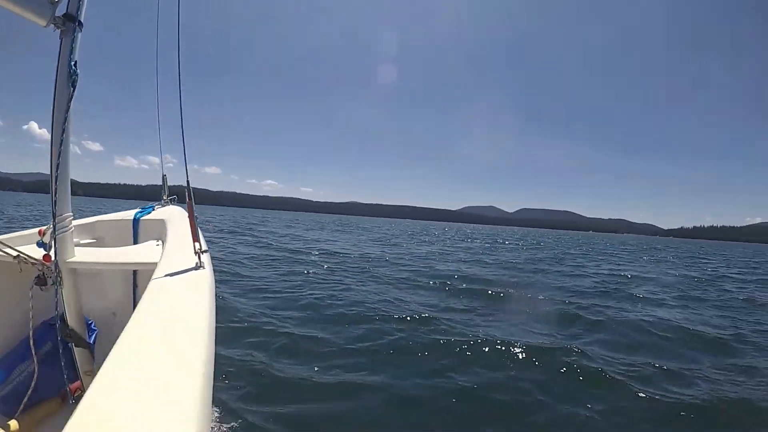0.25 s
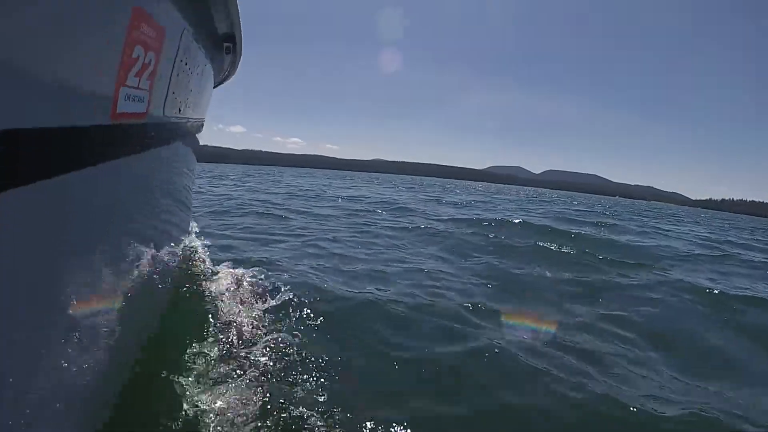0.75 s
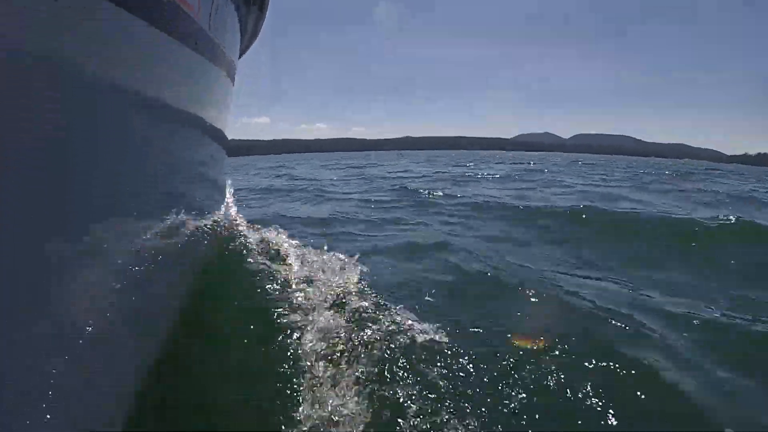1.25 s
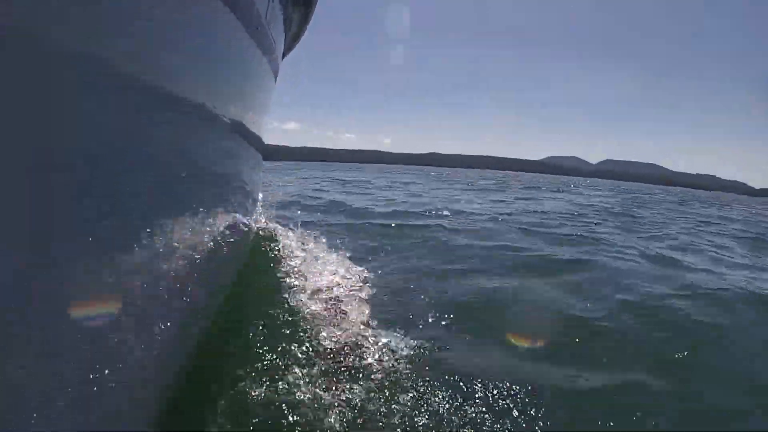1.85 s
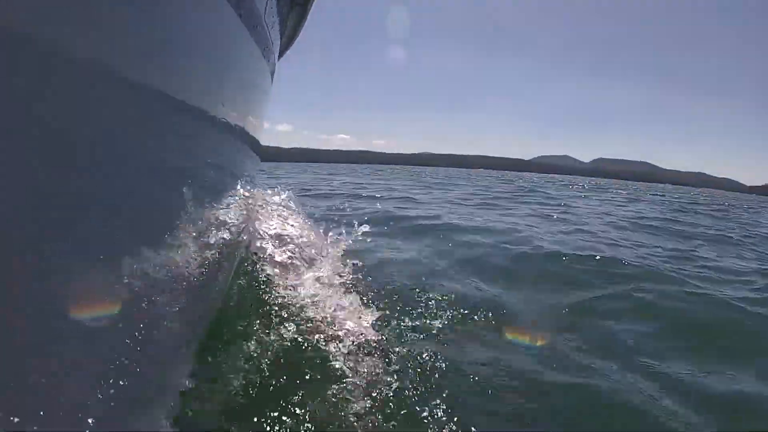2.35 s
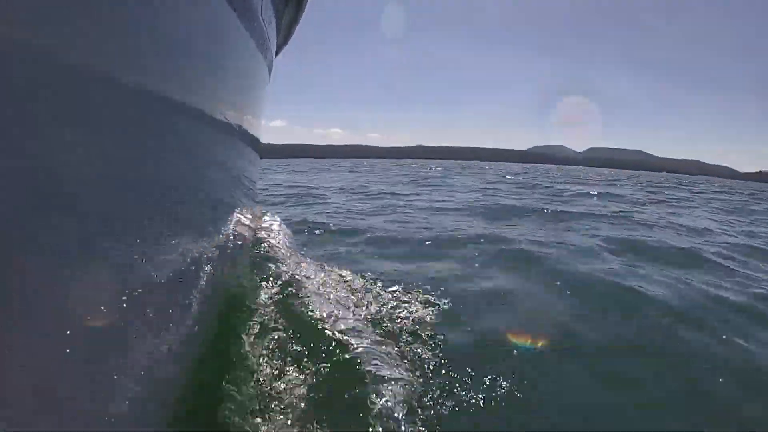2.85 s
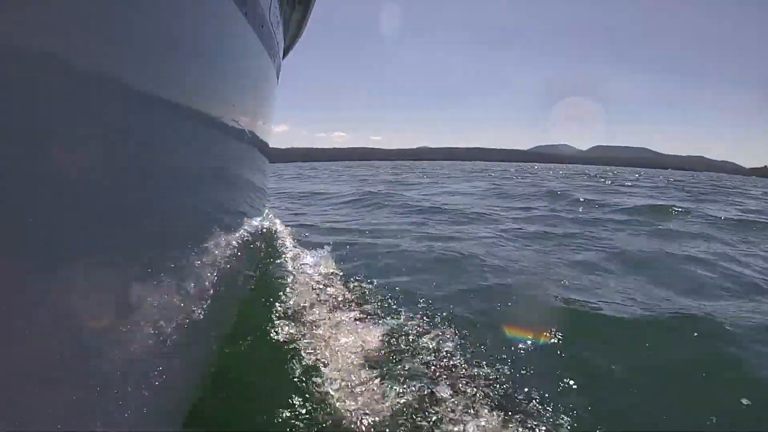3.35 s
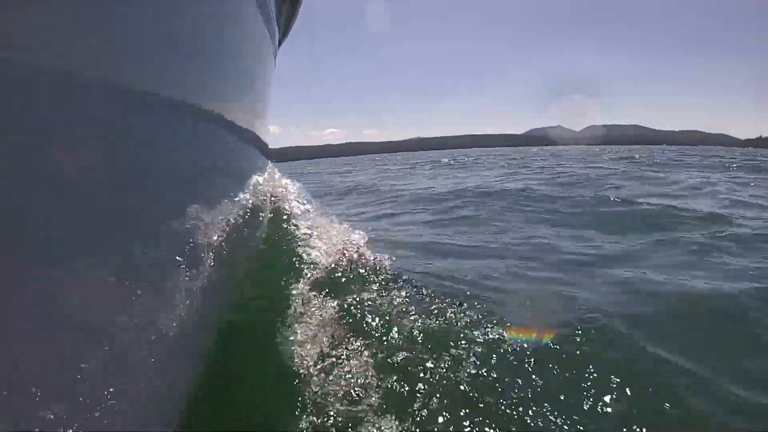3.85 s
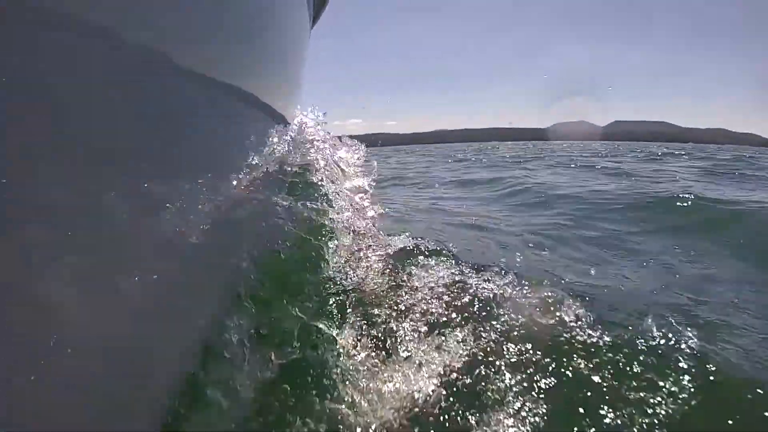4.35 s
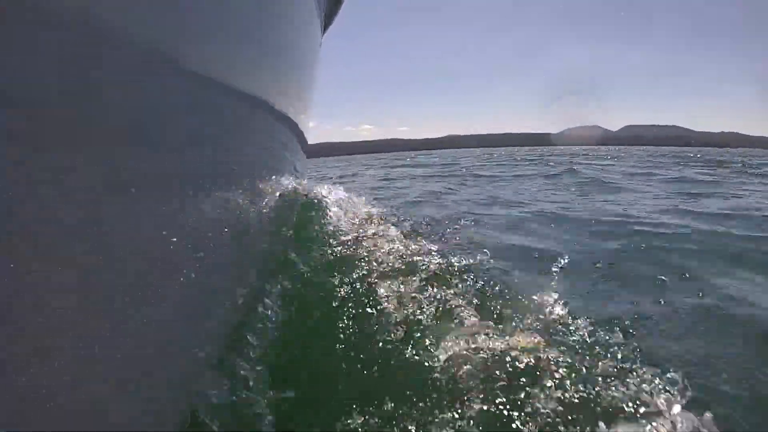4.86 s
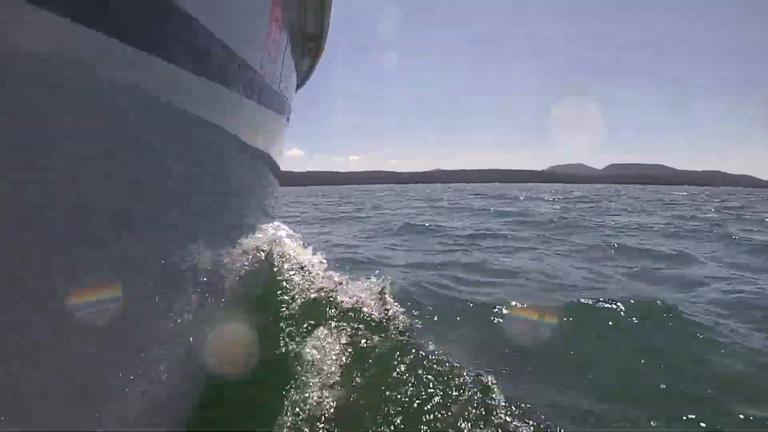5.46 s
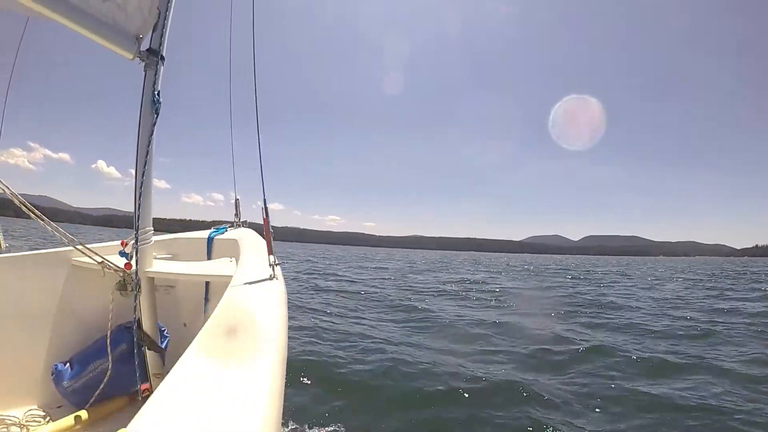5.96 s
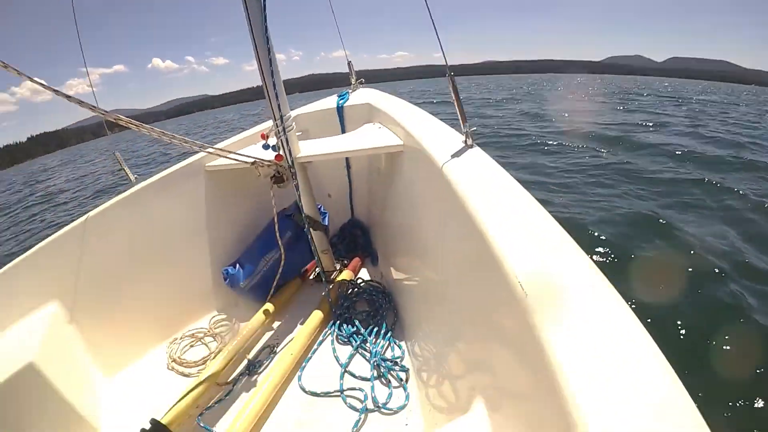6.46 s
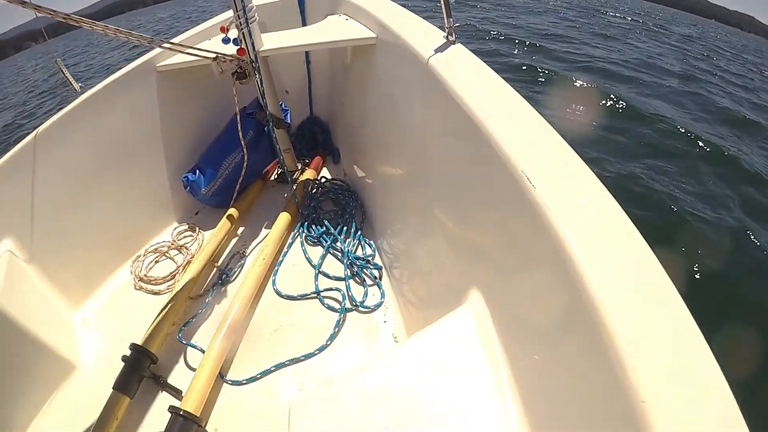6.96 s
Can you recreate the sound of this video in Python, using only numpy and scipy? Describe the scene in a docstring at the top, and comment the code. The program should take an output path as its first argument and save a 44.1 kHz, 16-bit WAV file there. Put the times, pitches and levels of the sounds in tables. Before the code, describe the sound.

Water hisses and splashes in quick surges along a small sailboat's bow, bubbles popping, then a hard plastic knock and brief rubbing end it.

```python
"""Spray hisses in surges over a low rumble while bubbles and drops pop; a plastic housing is lightly knocked
now and then, and later struck hard, pushed and rubbed.
A hand-held camera in the housing hangs over the bow wave of a small sailboat, then is laid in the boat.
Water is noise and tiny bubble rings under a moving spectrum; rumble is lumpy low noise; drops are short rings.
Blows ring the housing's modes, pushes and one thud are damped low rings, rubs drive modes with clicks and hiss."""
import sys
import numpy as np
from scipy import signal
from scipy.io import wavfile
from scipy.ndimage import uniform_filter1d

SR = 44100
rng = np.random.default_rng(int(sys.argv[2]) if len(sys.argv) > 2 else 0)


def wrap_up_sound(samples):
    """Save the sound to the file named by the first command line argument, as 16-bit audio."""
    columns = np.atleast_2d(samples).T
    # keep every value between -1 and 1, then stretch to whole-number steps
    tamed = np.clip(columns, -1, 1)
    steps = np.round(tamed * 32767).astype(np.int16)
    wavfile.write(sys.argv[1], SR, steps)


N = 317520

# colour of the water through the housing: f/Hz, relative density/dB
SPRAY_COLOUR = [(150, -10), (250, 0.5), (427, -9), (499, -3.5), (768, -11), (929, -7), (1360, -12),
                (1560, -6), (1990, -10.5), (3280, -10), (3890, -16), (5890, -19), (7380, -28),
                (8620, -13.5), (15500, -46)]
# steady fizz as the camera goes down the hull and comes back: t/s, fizz level/dB
STEADY_FIZZ = [(0.0, -82.5), (0.12, -75.5), (0.45, -72.5), (0.7, -76), (1.5, -65.5), (1.8, -70), (2.7, -76),
               (3.1, -72.5), (4.0, -69.5), (4.6, -64), (5.1, -71), (5.9, -72), (6.26, -76.5), (6.32, -81),
               (6.55, -80), (7.2, -88)]
# surges of spray: middle t/s, length/s, fizz level/dB, splash level/dB
SPRAY_SURGES = [(0.175, 0.054, -72, -54.5), (0.538, 0.11, -66, -57.5), (0.682, 0.065, -63.5, -56),
                (0.812, 0.12, -64.5, -50.5), (1.102, 0.11, -64, -54), (1.24, 0.11, -65, -57),
                (1.383, 0.046, -64, -50.5), (1.866, 0.049, -69, -61), (1.998, 0.076, -60.5, -51.5),
                (2.094, 0.062, -62.5, -51.5), (2.193, 0.037, -60.5, -56.5), (2.299, 0.067, -60, -49.5),
                (2.452, 0.058, -64.5, -52), (2.642, 0.19, -59.5, -47.5), (2.905, .17, -65, -54.5),
                (3.015, 0.042, -71, -50.5), (3.317, 0.16, -63, -52), (3.44, 0.086, -70, -54.5),
                (3.713, 0.096, -65.5, -57.5), (3.842, 0.021, -59, -54.5), (4.17, 0.11, -56.5, -46.5),
                (4.257, 0.038, -60, -51.5), (4.41, 0.08, -63.5, -54), (4.573, 0.076, -58.5, -49),
                (4.726, 0.14, -55.5, -47.5), (4.984, 0.12, -61, -50.5), (5.223, 0.084, -68, -60),
                (5.327, 0.097, -64.5, -49), (5.46, 0.097, -70, -56.5), (5.618, 0.092, -86, -59.5),
                (5.847, 0.062, -76, -59.5), (6.13, 0.091, -68, -60)]
# low gurgles along the hull: middle t/s, length/s, level/dB
HULL_GURGLES = [(0.197, 0.047, -55.5), (0.816, 0.3, -58), (2.043, 0.028, -52), (2.86, 0.1, -56.5),
                (3.733, 0.052, -59), (4.124, 0.033, -46.5), (4.192, 0.034, -49), (4.578, 0.033, -50),
                (4.688, 0.096, -51.5), (5.238, 0.063, -50.5)]
# colour of hull and wind: f/Hz, relative density/dB
RUMBLE_COLOUR = [(12, -48), (20, -3), (59, -0.5), (172, -5.5), (232, -7), (341, -10.5), (476, -16),
                 (900, -22), (1170, -31), (1980, -120)]
# single drops and bubbles: t/s, level/dB, f/Hz
SINGLE_DROPS = [(0.158, -39, 1220), (0.162, -34, 1630), (0.536, -38.5, 2920), (0.87, -32, 790),
                (1.045, -39, 1560), (2.077, -33, 1670), (2.21, -27.5, 1660), (2.276, -38.5, 2700),
                (2.324, -41, 2410), (2.404, -33, 1410), (2.601, -33, 2980), (2.667, -30.5, 2050),
                (2.74, -35, 1660), (2.805, -41, 2130), (2.996, -61, 1600), (3.146, -36, 865),
                (3.333, -33.5, 3700), (3.357, -29, 2320), (3.849, -41.5, 1650), (4.121, -30, 1570),
                (4.252, -31, 1620), (4.535, -30.5, 4680), (4.56, -31.5, 2800), (4.785, -33, 2200),
                (5.235, -40, 790), (5.417, -37.5, 1960), (5.438, -36.5, 1440), (5.61, -37, 1090)]
# modes of shell, mount, door, latch, one list a part: f/Hz, relative level/dB, free t60/s
HOUSING_MODES = [
    [(546, -2.5, 0.025), (733, 4, 0.023), (977, -6.5, 0.032), (1240, -11.5, 0.016)],
    [(185, 3, 0.071), (274, -5, 0.039), (418, -7, 0.047)],
    [(1455, -6, 0.02), (1630, 3.5, 0.01), (2030, -10, 0.0075), (2500, -23.5, 0.0049)],
    [(3650, 1, 0.01), (4520, -4, 0.015), (4750, 3, 0.012), (6010, -9, .012), (8600, 3, 0.0023)],
]
# blows: t/s, levels of shell, mount, door, latch/dB, ring length/share of free t60
HOUSING_KNOCKS = [(0.497, -34, -28, -48, -67, 0.8), (2.2154, -26, -51, -17.5, -42, 0.36),
                  (2.2666, -24.5, -40, -29, -41, 0.49), (2.425, -33, -35.5, -31.5, -43.5, 0.73),
                  (2.448, -42, -38, -49, -42.5, 0.9), (4.099, -40, -52, -45, -62, 0.68),
                  (4.506, -37, -33.5, -52, -49, 0.82), (6.1029, -37, -30.5, -56, -70, 1.8),
                  (6.1159, -57, -19.5, -49, -77, 0.61), (6.135, -45.5, -32, -62, -71, 3.4),
                  (6.221, -54, -54, -46, -48, .5), (6.2836, -7, -2.5, -1.5, -19.5, 0.28),
                  (6.2901, -1.5, -19, -7.5, -18.5, 0.84), (6.372, -30, -34.5, -50, -63, 0.9),
                  (6.4, -26, -36, -48, -54, 0.48), (6.4142, -23.5, -55, -34, -58, 0.69),
                  (6.442, -49, -30, -41, -65, 0.52), (6.4714, -27, -12.5, -50, -61, 0.75),
                  (6.498, -29, -23, -51, -48, 0.85), (6.82, -40, -41, -35, -46, 0.33),
                  (6.902, -26.5, -36, -63, -65, 0.43), (7.0664, -20, -21, -22, -46, 0.51),
                  (7.118, -35, -32.5, -41.5, -58, 0.66)]
# pushes and one thud on the housing: t/s, level/dB, f/Hz (minus = inverted swing), t60/s
HOUSING_PUSHES = [(6.108, -23, -68, 0.053), (6.2832, 1, -260, 0.026), (6.503, -18, 50, 0.092),
                  (6.827, -19, 84, 0.095), (6.959, -12.5, -91, 0.039), (6.972, -21.5, -36, 0.13),
                  (7.046, -17, -37, 0.13), (7.066, -13.5, -100, 0.045), (7.073, -18.5, 66, 0.052)]
# rubs on hand and deck: loudest t/s, rise per 20 dB/s, fall per 20 dB/s, levels of body, door, rustle/dB
RUB_STROKES = [(6.11, 0.0087, 0.056, -45, -58, -78), (6.145, 0.051, 0.09, -55, -56, -83),
               (6.315, .008, 0.13, -43.5, -47.5, -66.5), (6.475, 0.066, 0.092, -40, -47, -68),
               (6.822, 0.0037, 0.033, -40.5, -47.5, -59.5), (6.945, 0.075, 0.13, -49, -55.5, -65),
               (6.98, 0.024, 0.012, -25, -37, -58), (7.05, 0.033, 0.009, -22, -28, -44.5),
               (7.068, 0.015, 0.0027, -30, -29, -55), (7.14, 0.16, 0.17, -45, -52.5, -68.5),
               (7.199, 0.035, 0.042, -36.5, -46.5, -62)]

STEADY_SPLASH_DB, SPLASH_DB_PER_FIZZ_DB = -62.5, 0.4  # steady splash at -72.5 dB of fizz
STEADY_GURGLE_DB, SURGE_GURGLE_RE_SPLASH_DB = -61, -17
SURGE_EDGE_POWER = 1.92  # 2 = bell curve; higher = flatter top, steeper ends
RUMBLE_DB = -51.5
DROP_T60_S = 0.016
SLIPS_PER_S, SLIP_JITTER = 430, 0.5  # nominal rate; rms share of it
CEILING, EDGE_HZ = 0.8, 15500
HISS_BEFORE_SMOOTHING_DB = -76


def amp(db):
    """Decibels to gain."""
    return 10 ** (np.asarray(db) / 20)


def unit(x):
    """Scales to rms 1."""
    return x / np.sqrt(np.mean(x ** 2) + 1e-20)


def read(points, hz):
    """Straight lines between spectrum points on a log-frequency axis."""
    f, value = np.transpose(points)
    return np.interp(np.log(hz + 1), np.log(f + 1), value)


def add(mix, s, sound):
    """Mixes a sound in at time s."""
    part = mix[round(s * SR):][:len(sound)]
    part += sound[:len(part)]


def ring(hz, t60_s, glide=0.0, rise_s=0.00031):
    """A dying sine with a soft start; its pitch may glide up as a bubble's does."""
    t = np.arange(int(abs(t60_s) * SR) + 8) / SR
    turns = hz * t * (1 + glide * t / t60_s)
    return amp(-60 * t / t60_s) * (1 - np.exp(-t / rise_s)) * np.sin(2 * np.pi * turns)


def shaped(x, field_db, size):
    """Multiplies the short-time spectra of x by a level field over frequency and time."""
    hz, t, z = signal.stft(x, SR, nperseg=size, noverlap=size * 3 // 4)
    z = z * amp(field_db(hz, t))
    return signal.istft(z, SR, nperseg=size, noverlap=size * 3 // 4)[1][:N]


def patches(hz, t, wide, long):
    """Smooth random blotches, wide in bins of frequency and long in frames of time."""
    field = rng.standard_normal((len(t), len(hz))).T
    field = uniform_filter1d(field, wide, 0)
    return unit(uniform_filter1d(field, long, 1))


def grains(per_s, spread_db, cycles, low_hz, high_hz, count=36):
    """Countless tiny bubbles: short rings spread over a pitch range, a few of them large."""
    gain = amp(spread_db * np.minimum(rng.exponential(1, N), 6))
    hits = gain * (rng.random(N) < per_s / SR)
    kind = rng.integers(0, count, N)
    out = np.zeros(N)
    for k, hz in enumerate(np.geomspace(low_hz, high_hz, count)):
        bubble = hz * ring(hz, cycles / hz, glide=0.31)  # level rises with pitch
        out += signal.oaconvolve(hits * (kind == k), bubble)[:N]
    return unit(out)


def swells(t, s, length_s, db):
    """Summed power of smooth, rounded swells."""
    u = abs(t - s[:, None]) / (length_s[:, None] / 2)
    return (amp(db[:, None]) ** 2 * np.exp(-u ** SURGE_EDGE_POWER)).sum(0)


def water_levels_db(t):
    """Gurgle, splash and fizz levels: steady bow-wave power plus the power of surges and gurgles."""
    steady_db = np.interp(t, *np.transpose(STEADY_FIZZ))
    s, length_s, fizz_db, splash_db = np.transpose(SPRAY_SURGES)
    surge = swells(t, s, length_s, splash_db)
    gurgle = amp(STEADY_GURGLE_DB) ** 2 + amp(SURGE_GURGLE_RE_SPLASH_DB) ** 2 * surge
    gurgle = gurgle + swells(t, *np.transpose(HULL_GURGLES))
    splash = amp(STEADY_SPLASH_DB + SPLASH_DB_PER_FIZZ_DB * (steady_db + 72.5)) ** 2 + surge
    fizz = amp(steady_db) ** 2 + swells(t, s, length_s, fizz_db)
    return 10 * np.log10([gurgle, splash, fizz])


def wave():
    """Hiss and bubbles, coloured by the housing, swelling with each surge."""
    bubbles = grains(3000, spread_db=2.0, cycles=13.6, low_hz=300, high_hz=14400)
    blips = grains(300, spread_db=2.5, cycles=28.0, low_hz=597, high_hz=6070, count=24)  # larger bubbles
    crackle = grains(160, spread_db=4.5, cycles=3.3, low_hz=2000, high_hz=13800, count=8)  # droplets striking
    ticks = grains(800, spread_db=2.5, cycles=14.0, low_hz=6420, high_hz=12200, count=8)  # finest spray bursting
    water = 0.67 * rng.standard_normal(N) + 0.44 * bubbles + 0.3 * blips + 0.15 * crackle + 0.28 * ticks

    def field_db(hz, t):
        """Three band levels blended across log frequency, with fixed colour, blotches, flicker and gusts."""
        place = np.interp(np.log(hz + 1), np.log([700, 2000, 7000]), np.arange(3))
        share = np.maximum(1 - abs(place[:, None] - np.arange(3)), 0)
        tint_db = read(SPRAY_COLOUR, hz) - share @ read(SPRAY_COLOUR, np.array([600, 2400, 9000]))
        width_db = -10 * np.log10(np.array([800, 3300, 1800]) / (SR / 2))  # band widths/Hz: level to density
        flicker = unit(uniform_filter1d(rng.standard_normal(len(t)), size=5))
        gusts = unit(uniform_filter1d(rng.standard_normal((len(t), 3)), size=20, axis=0)).T
        blotch_db = 1.33 * patches(hz, t, wide=5, long=30) + 0.9 * patches(hz, t, wide=16, long=3)
        moving_db = blotch_db + 1.51 * flicker + 1.43 * share @ gusts
        return (tint_db + share @ width_db)[:, None] + share @ water_levels_db(t) + moving_db
    return shaped(water, field_db, size=256)


def rumble():
    """Low wash of hull and wind: noise of fixed colour with slow random lumps."""
    def field_db(hz, t):
        """The fixed colour plus lumps."""
        return read(RUMBLE_COLOUR, hz)[:, None] + 1.44 * patches(hz, t, wide=4, long=5)
    return amp(RUMBLE_DB) * unit(shaped(rng.standard_normal(N), field_db, size=2048))


def drops():
    """Each drop is a bright tick and a short rising ring."""
    out = np.zeros(N)
    for s, db, hz in SINGLE_DROPS:
        add(out, s, amp(db) * ring(hz, DROP_T60_S, glide=0.027, rise_s=0.00052))
        add(out, s, amp(db - 8.5) * ring(2.21 * hz, 0.0037, rise_s=0.0001))
    return out


def knocks():
    """Each blow rings all modes of the housing, inward first, with a short noise crack."""
    out = np.zeros(N)
    t = np.arange(400) / SR
    for s, *part_db, share in HOUSING_KNOCKS:
        for modes, blow_db in zip(HOUSING_MODES, part_db):
            for hz, db, t60_s in modes:
                detuned_hz = hz * rng.uniform(0.96, 1.03)
                mode = ring(detuned_hz, t60_s * share, rise_s=0.0001 + 0.34 / hz)
                add(out, s, -amp(db + blow_db) * mode)
        noise = uniform_filter1d(rng.standard_normal(len(t)), size=4)
        crack = uniform_filter1d(noise, size=3) * amp(-60 * t / 0.016)
        add(out, s, amp(part_db[3] + 1.0) * crack)  # follows the latch level
    return out


def pushes():
    """Pushes and one thud on the housing: each is a short, damped low swing or thud."""
    out = np.zeros(N)
    for s, db, hz, t60_s in HOUSING_PUSHES:
        add(out, s, amp(db) * ring(hz, t60_s, rise_s=0.0018))
    return out


def driven_part(drive, modes, gain_db, t60_share):
    """Modes of one part rung by a drive, alternating in sign, damped by the touch."""
    out = np.zeros(N)
    for k, (hz, db, t60_s) in enumerate(modes):
        mode = ring(hz, t60_share * t60_s)
        out += (-1) ** k * amp(0.23 * db) * signal.oaconvolve(drive, mode)[:N]
    return amp(gain_db) * out


def rubs():
    """Uneven stick-slip clicks and hiss drive the housing's modes, heavily damped by the touch."""
    t = np.arange(N) / SR
    jitter = 1 + SLIP_JITTER * unit(uniform_filter1d(rng.standard_normal(N), size=60))
    slip_count = np.floor(np.cumsum(SLIPS_PER_S * abs(jitter)) / SR)
    slips = np.diff(slip_count, prepend=0) * rng.uniform(0.41, 1, N)
    drive = unit(slips) + 0.78 * rng.standard_normal(N)
    parts = zip(HOUSING_MODES, (-3.0, -4.0, 0, 0), (0.36, 0.19, 0.52, 0.4))
    shell, mount, door_modes, latch = [driven_part(drive, *part) for part in parts]
    body = -unit(shell + mount)
    door = -unit(unit(door_modes) + 0.07 * unit(latch))
    band = signal.butter(2, [3200, 8500], "band", fs=SR, output="sos")
    rustle = unit(signal.sosfilt(band, drive))
    out = np.zeros(N)
    for s, rise_s, fall_s, body_db, door_db, rustle_db in RUB_STROKES:
        stroke = amp(-20 * np.where(t < s, (s - t) / rise_s, (t - s) / fall_s))
        out += stroke * (amp(body_db) * body + amp(door_db) * door + amp(rustle_db) * rustle)
    return out


def scene():
    """All sources reach one microphone."""
    return (wave() + rumble() + drops() + knocks() + pushes() + rubs())[None]


def record(dry):
    """Soft squash of the loudest peaks, faint added hiss, then the band limit of the recorder."""
    squashed = CEILING * np.tanh(dry / CEILING)
    hiss = amp(HISS_BEFORE_SMOOTHING_DB) * uniform_filter1d(rng.standard_normal(dry.shape), size=3)
    lowpass = signal.firwin(511, EDGE_HZ, window=("kaiser", 9), fs=SR)
    return signal.oaconvolve(squashed + hiss, lowpass[None], "same")


dry = scene()
out = record(dry)
wrap_up_sound(out)
```